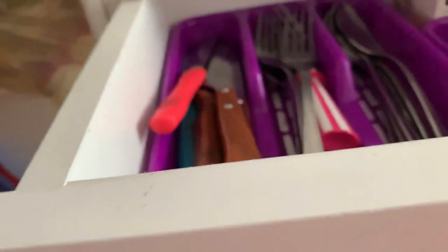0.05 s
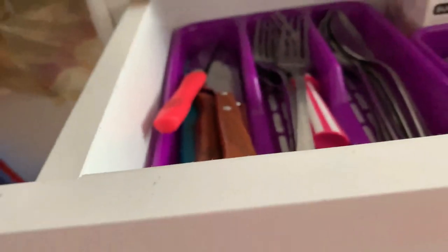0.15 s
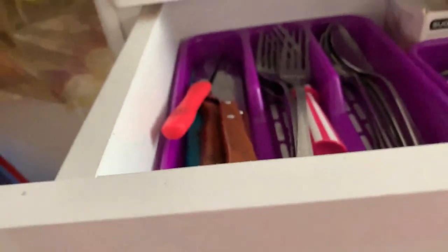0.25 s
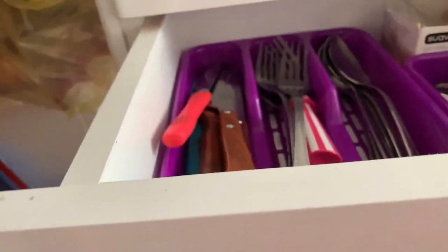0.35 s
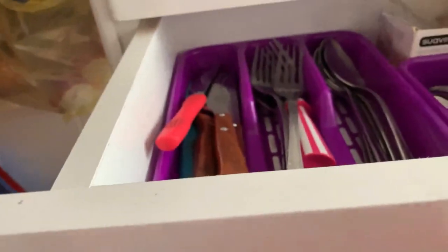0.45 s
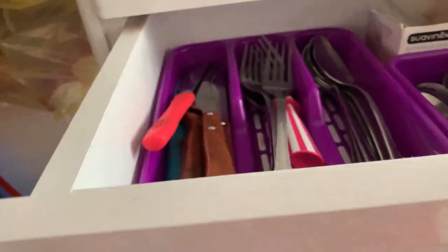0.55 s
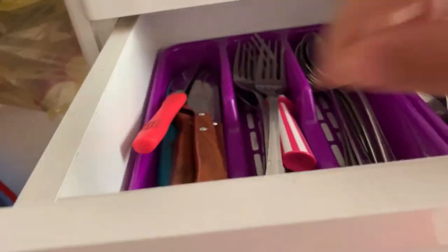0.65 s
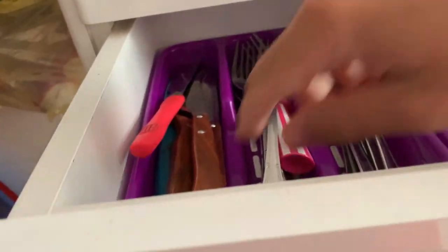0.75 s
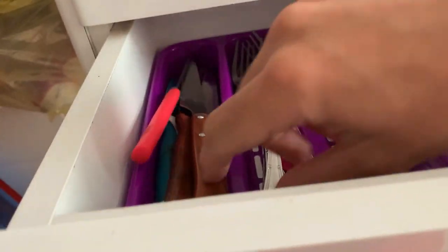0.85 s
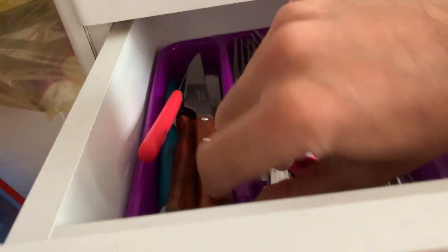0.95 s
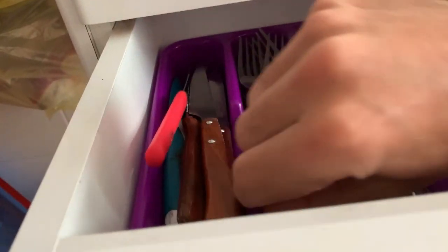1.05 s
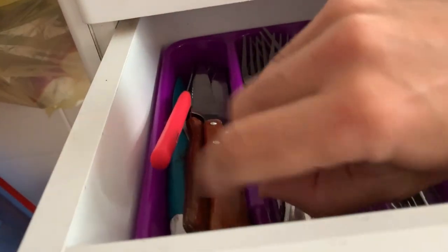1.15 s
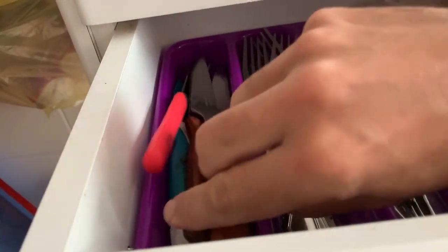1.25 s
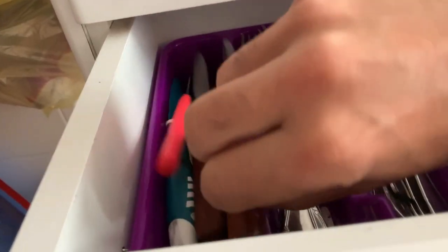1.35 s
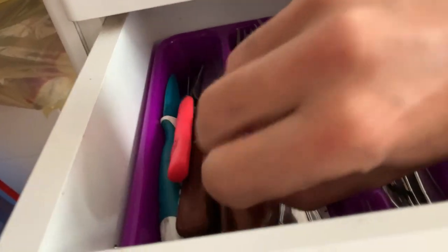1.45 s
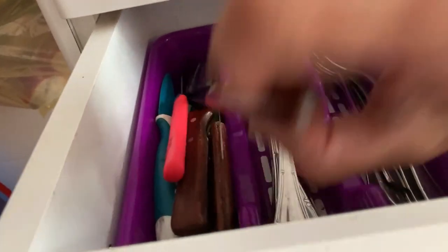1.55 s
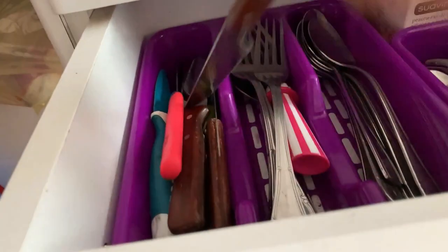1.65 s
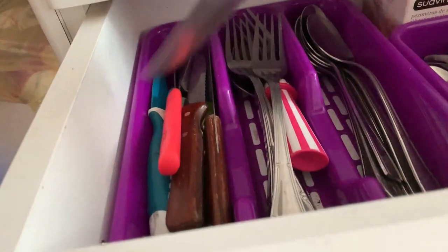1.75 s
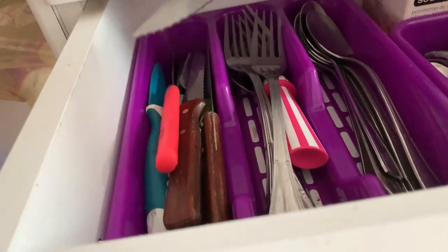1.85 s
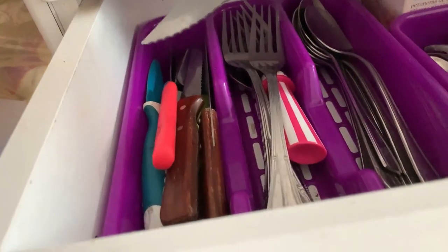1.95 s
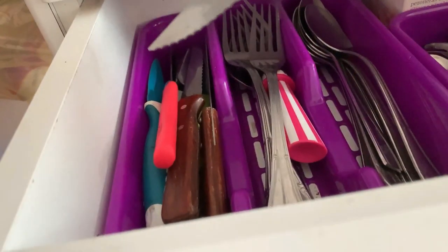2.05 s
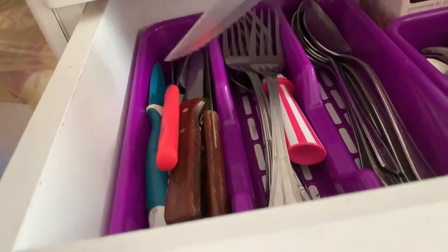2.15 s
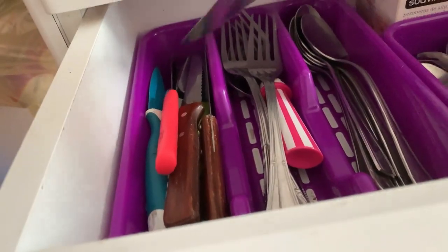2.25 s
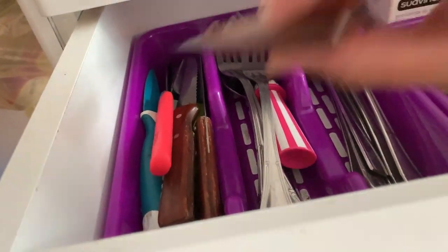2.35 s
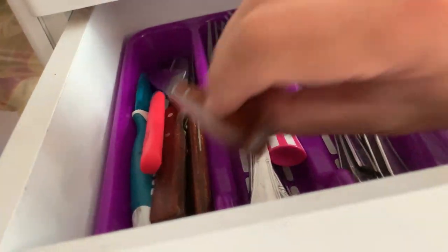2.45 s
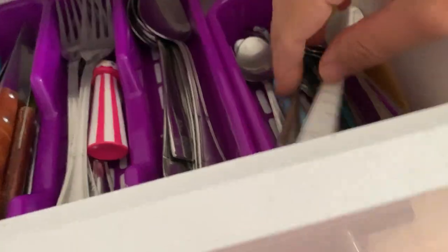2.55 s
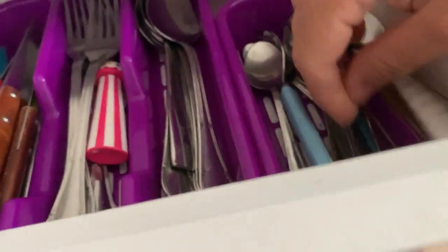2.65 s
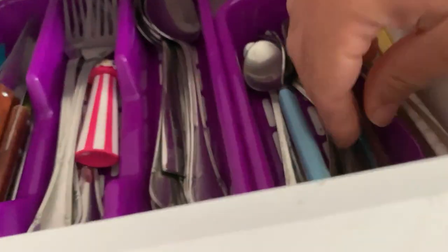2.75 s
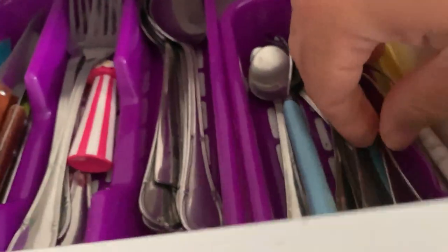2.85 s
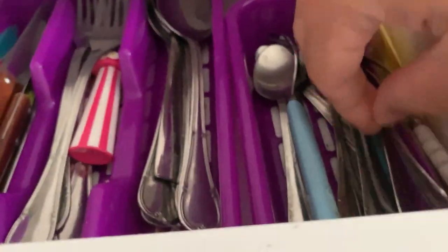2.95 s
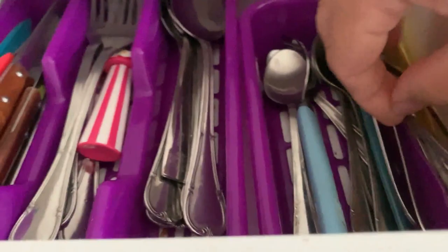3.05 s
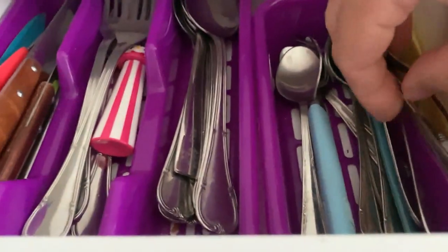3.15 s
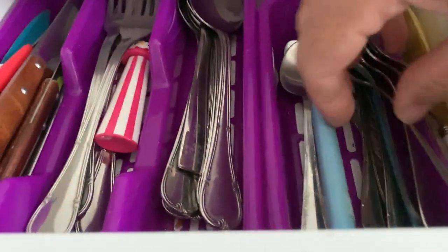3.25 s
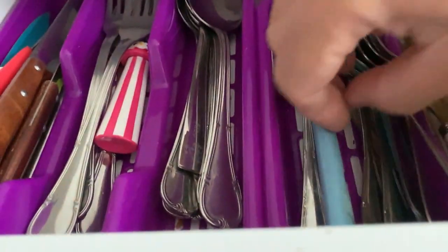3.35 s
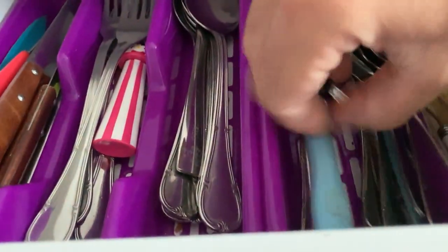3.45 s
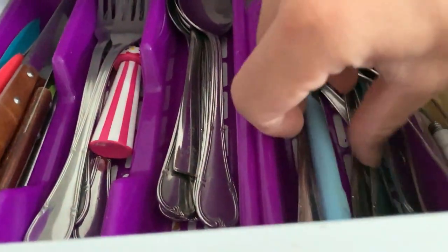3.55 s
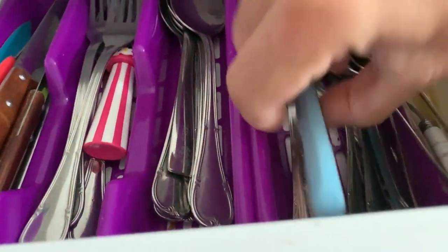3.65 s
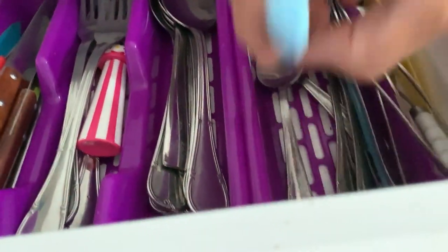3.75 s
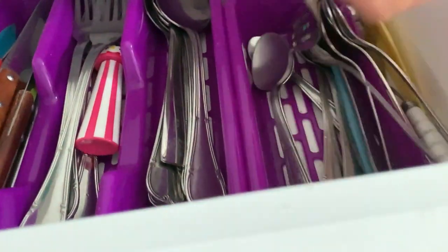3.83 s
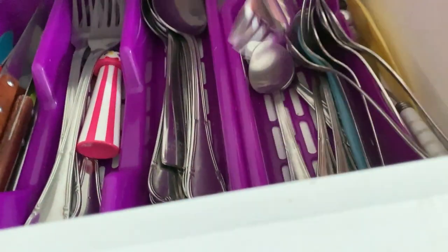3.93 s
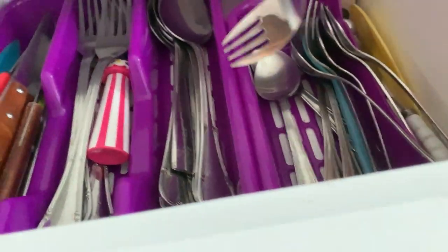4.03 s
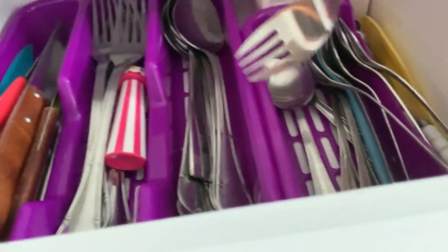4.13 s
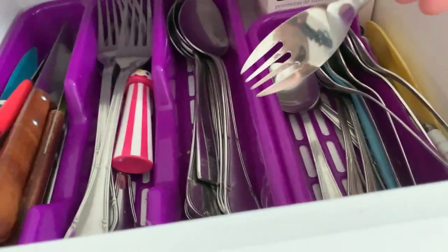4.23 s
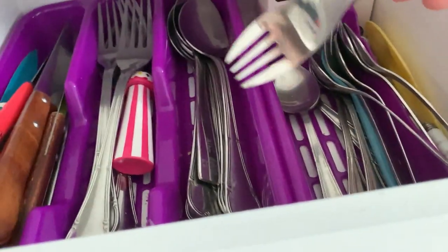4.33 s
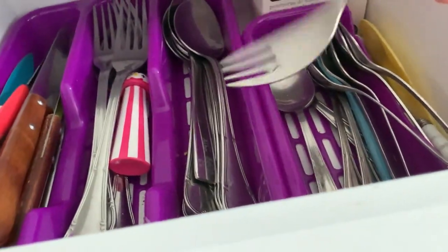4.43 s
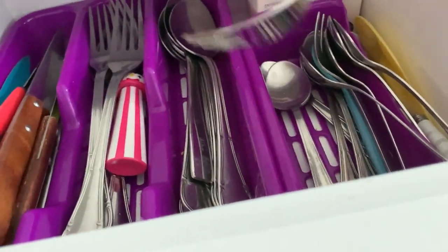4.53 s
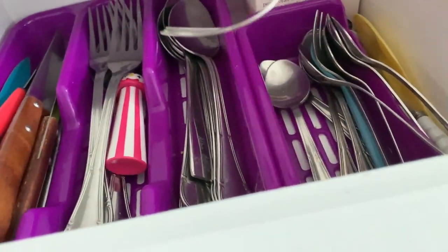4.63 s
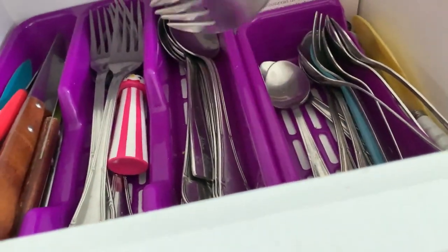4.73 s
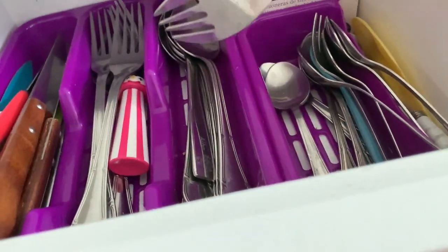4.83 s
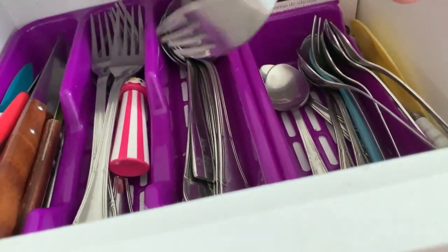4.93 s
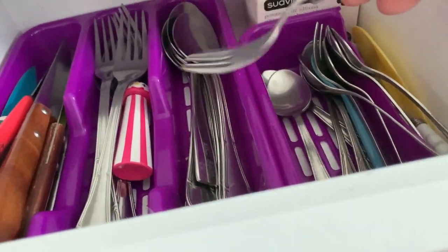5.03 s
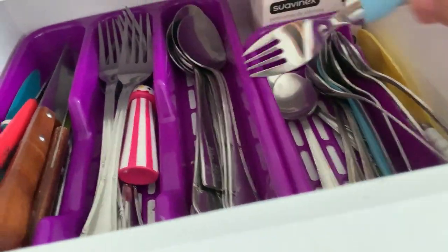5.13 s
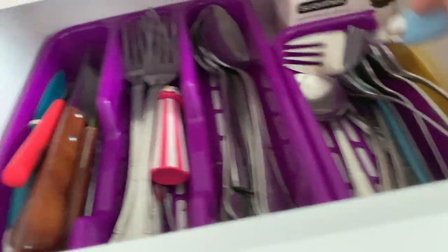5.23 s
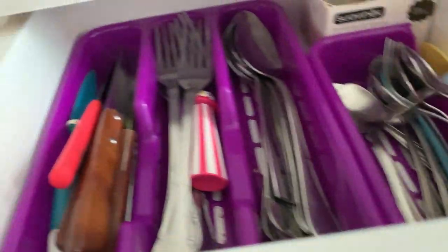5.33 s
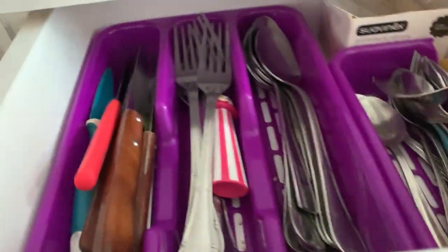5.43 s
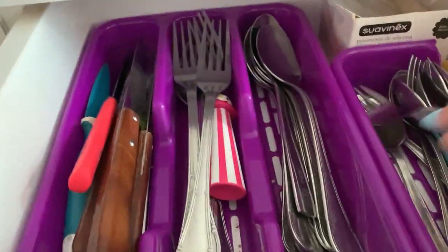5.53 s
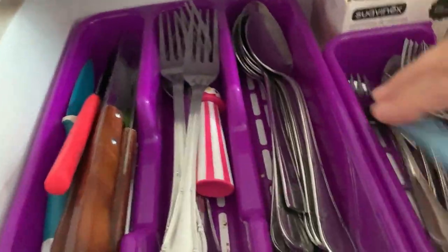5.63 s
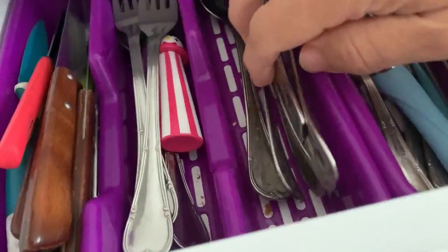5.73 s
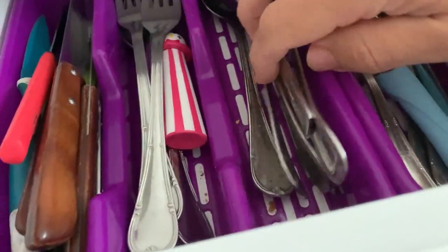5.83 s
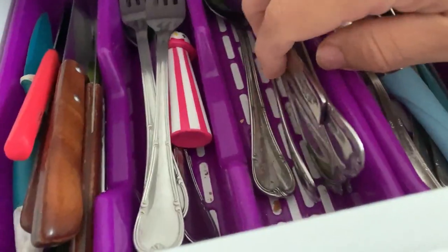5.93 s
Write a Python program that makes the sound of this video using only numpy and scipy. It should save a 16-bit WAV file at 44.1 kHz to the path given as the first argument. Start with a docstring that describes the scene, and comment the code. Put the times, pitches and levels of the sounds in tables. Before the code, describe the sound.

A drawer rolls to a stop with a soft bump. A hand then rummages through steel cutlery in three bursts: pieces clink, chatter and scrape against each other and knock on their hollow plastic tray. A knife rings faintly as it is lifted out, and later a fork rings briefly. The sound is close, in a small, hard kitchen with a low rumble and faint electrical hum.

```python
"""A small, hard kitchen, close up: a drawer rolls to a stop and a hand rummages through steel cutlery.
Pieces clink and chatter against each other, scrape along, and knock and rub their hollow plastic tray.
A knife and a fork ring freely as they are lifted out.
Cupboards and walls answer, over a low rumble and a faint mains hum."""
import sys
import numpy as np
from scipy import signal
from scipy.fft import rfft, irfft
from scipy.io import wavfile
from scipy.ndimage import uniform_filter1d

SR = 44100
rng = np.random.default_rng(int(sys.argv[2]) if len(sys.argv) > 2 else 0)


def wav_record(signal):
    """Record a signal, one row per channel, as 16-bit PCM in the file named by sys.argv[1]."""
    frames = np.transpose(np.atleast_2d(signal))
    bounded = np.clip(frames, -1, 1)
    # unit amplitude maps onto the largest positive 16-bit level
    quanta = np.round(bounded * 32767).astype(np.int16)
    wavfile.write(sys.argv[1], SR, quanta)


N = 263718
TIME = np.arange(N) / SR
HIT = np.arange(8192) / SR  # seconds within one hit
TOP_HZ = 15900

# Sharp hits: a short, abrupt click at 2.574 s, and cutlery clinking together in all the other rows.
# Each row: start in seconds, bright crack and dull clack levels in relative dB.
SHARP_HITS = [(.039, -19, -20), (0.094, -25, -22.5), (.203, -40, -39), (.923, -7.5, -16.5),
              (.977, -12.5, -17), (.998, -11.5, -25), (1.088, -12.5, -17), (1.118, -15, -22),
              (1.137, -4, -15), (1.184, -18, -22.5), (1.337, -9.5, -14), (1.365, -14, -18.5),
              (1.392, -11.5, -12.5), (1.41, -2, -13.5), (1.545, -15.5, -22), (1.64, -13.5, -29),
              (1.684, -10.5, -31.5), (1.754, -11.5, -29), (1.765, -8.5, -23.5), (2.503, -7, -10),
              (2.531, -10, -15.5), (2.574, -19, -19), (2.663, -15.5, -21), (2.695, -9.5, -10.5),
              (2.711, -7, -17.5), (2.922, -8.5, -14.5), (2.94, -8.5, -30.5), (2.971, -14, -31),
              (3.047, -9, -22.5), (3.118, -12.5, -18.5), (3.144, -8.5, -27.5), (3.309, -13.5, -27.5),
              (3.342, -1.5, -14.5), (3.374, -12, -22.5), (3.422, -15, -37.5), (3.529, -14.5, -27),
              (3.551, -9, -25), (3.604, -5.5, -15.5), (3.782, -12.5, -38), (3.845, -22, -34),
              (3.917, -12, -27), (3.991, -7.5, -26), (4.032, -6.5, -38), (5.441, -4, -23.5),
              (5.487, -2, -21), (5.52, -10, -29), (5.595, -12, -32), (5.62, -6.5, -27), (5.744, -6, -28.5),
              (5.878, -21.5, -39)]
# One piece is shoved across another.
# Each row: start and length in seconds, steel and plastic levels in relative dB.
SCRAPES = [(.985, 0.059, -14.5, -21), (1.08, .028, -11, -30), (1.134, .012, -10.5, -24),
           (1.394, 0.055, -14, -21.5), (1.575, 0.028, -18, -28), (1.715, 0.024, -26, -26.5),
           (2.497, 0.024, -20, -23.5), (2.688, 0.095, -12.5, -19), (2.809, 0.041, -14.5, -27),
           (3.137, 0.032, -14.5, -23), (3.326, 0.037, -14.5, -26.5), (3.577, 0.049, -12.5, -24.5),
           (3.717, 0.018, -20, -22.5), (3.808, 0.015, -23, -31), (4.026, 0.044, -15, -30.5),
           (5.227, 0.021, -25, -21.5), (5.63, 0.026, -27, -26.5), (5.738, 0.064, -13, -30)]
# A handle drops on the tray. Each row: start in seconds, level in relative dB, main resonance in Hz.
KNOCKS = [(.01, -24, 410), (.071, -24.5, 408), (0.502, -42, 407), (.941, -18.5, 355), (.988, -12.5, 395),
          (1.057, -15.5, 345), (1.126, -18.5, 374), (1.343, -17.5, 364), (1.392, -13, 403),
          (1.417, -15.5, 379), (1.462, -18.5, 470), (1.492, -17, 372), (2.513, -20.5, 306),
          (2.666, -23.5, 394), (2.73, -15, 420), (2.75, -16, 448), (3.141, -30, 356), (3.342, -26.5, 390),
          (3.616, -12.5, 392), (3.724, -20, 351), (5.24, -13.5, 399), (5.559, -27, 414),
          (5.638, -16.5, 398), (5.774, -23.5, 432), (5.877, -25.5, 362)]
# The hand pushes into the pile.
# Each row: start and hold in seconds, tray rub and steel jostle levels in relative dB.
PUSHES = [(0.768, 0.34, -41, -51), (0.958, 0.25, -25, -25.5), (1.334, 0.19, -22, -23),
          (1.648, 0.1, -29.5, -30), (2.502, 0.015, -28.5, -23), (2.612, .03, -38.5, -46),
          (2.69, 0.19, -26, -21), (2.92, .06, -29.5, -33.5), (3.121, 0.056, -27.5, -36.5),
          (3.24, 0.076, -37.5, -49), (3.33, 0.081, -28, -24), (3.556, 0.023, -28.5, -29),
          (3.72, 0.21, -38, -36), (3.915, 0.091, -27.5, -15), (5.236, 0.082, -42, -61),
          (5.44, 0.36, -30, -19), (5.88, 0.12, -43, -44)]
# The drawer box is bumped. Each row: start in seconds, level in dB, pitch in Hz.
BUMPS = [(0.137, -27.5, 74), (3.949, -35.5, 56.4)]
# Free-ringing steel. Each row: frequency in Hz, level in relative dB, 60 dB decay time in seconds.
FORK_MODES = [(3440, -22, .55), (4651, -12, .18), (5394, -2, .4), (7553, -14, .2), (8700, -10, .2),
              (9545, -7, .29), (9846, -5, .22), (11200, -5, .15), (13990, -4, .27)]
KNIFE_MODES = [(3289, -19, .25), (4226, -22, .35), (7224, -6, .15), (8500, -15, .28), (10530, -9, .22),
               (13770, -9, .22)]
# The tray. Each row: multiple of its main resonance, level in relative dB, 60 dB decay time in seconds.
TRAY_MODES = [(.52, -20, 0.046), (.8, -5.5, 0.04), (1, 0.5, 0.045), (1.17, -7, 0.045), (1.83, -11, 0.033),
              (2.15, -5, 0.028)]
# Tone curves of the sources. Each row: frequency in Hz, gain in relative dB.
STEEL_EQ = [(1000, -37), (2800, -14), (4500, -9), (6500, -3.5), (8500, 3), (14000, 2.5), (16000, 3)]
PLASTIC_EQ = [(60, -21.5), (170, -14.5), (300, 5), (410, 14.5), (570, -3), (850, 3), (1800, 2),
              (3000, -1.5), (5000, -7), (10000, -50)]
TRAY_RUB_EQ = [(60, -19.5), (200, -9.5), (410, 6), (560, -4.5), (1900, -8.5), (4500, -11), (9000, -11),
               (16000, -14)]
ROLLER_EQ = [(25, -8), (70, -9), (130, -3), (420, -9.5), (620, -13.5), (1500, -25), (5000, -23.5),
             (14000, -36)]
ROOM_TONE_EQ = [(25, -15), (55, -0.5), (110, -18), (180, -18), (400, -31), (1000, -37), (3000, -48.5),
                (15000, -52)]
# Stereo image: side against mid, then each channel's tone. Each row: frequency in Hz, gain in dB.
WIDTH_EQ = [(200, -16), (400, -13), (750, -1.5), (2300, 0.5), (4400, 1), (8100, -6.5), (15000, -18)]
LEFT_EQ = [(150, 1.1), (1100, -2.4), (4000, -1.3)]
RIGHT_EQ = [(150, 0.51), (1100, 1.9), (4000, -0.33)]
# Mains hum. Each row: frequency in Hz, RMS level in dB.
MAINS_HUM = [(48.4, -69.5), (96.9, -59.5)]


def clinks_and_click(crack_trim_db=-3, clack_trim_db=-5, ring_db=-22, crack_t60=.022, clack_t60=.064):
    """Steel cracks and rings briefly, damped by the pile, as handles clack; one hit is just a click."""
    out = np.zeros((2, N))
    bite = 1 - np.exp(-HIT / .00057)  # attack of about half a millisecond
    for start, crack_db, clack_db in SHARP_HITS:
        force = chatter()
        ringing = ring(FORK_MODES + KNIFE_MODES, HIT, scale=rng.uniform(.8, 1.15), contact_t60=.12)
        crack = contact_spot(colour(noise(len(HIT)) * bite * fade(HIT, crack_t60), STEEL_EQ))
        bright = at_peak(crack, 0) + at_peak(ringing, ring_db)
        clack = contact_spot(colour(noise(len(HIT)) * bite * fade(HIT, clack_t60), PLASTIC_EQ))
        add(out, start, at_peak(signal.fftconvolve(bright, force, axes=1), crack_db + crack_trim_db))
        add(out, start, at_peak(signal.fftconvolve(clack, force, axes=1), clack_db + clack_trim_db))
    return out


def chatter(decay_s=.003, scatter_db=4, rebounds=6):
    """The force of a first contact and a quick run of uneven rebounds."""
    when = rng.uniform(0, 2 * decay_s, rebounds)
    strength = np.exp(-when / decay_s) * undb(scatter_db * rng.standard_normal(rebounds))
    force = np.zeros(len(HIT) // 2)
    force[(when * SR).astype(int)] = strength * rng.choice([-1, 1], rebounds)
    force[0] = .63
    return force[None]


def ring(modes, t, scale=1, contact_t60=np.inf, scatter_db=3):
    """Decaying modes: where the blow lands sets their strengths, and touching other things damps them."""
    hz, db, t60 = np.transpose(modes)
    waves = np.sin(2 * np.pi * scale * hz[:, None] * t) * fade(t, t60[:, None])
    strength = undb(db + scatter_db * rng.standard_normal((2, len(hz))))
    polarity = rng.choice([-1, 1], (2, len(hz)))
    return (strength * polarity) @ waves * fade(t, contact_t60)


def contact_spot(x, lumps_db=3, bands=44):
    """Every point of contact favours its own resonances of the pile."""
    hz = np.geomspace(600, TOP_HZ, bands)
    return colour(x, np.column_stack([hz, lumps_db * rng.standard_normal(bands)]))


def scrapes(steel_trim_db=-1, plastic_trim_db=-2, roundness=.34):
    """A shove swells and eases while tines and edges judder over each other."""
    out = np.zeros((2, N))
    for start, length, steel_db, plastic_db in SCRAPES:
        pressure = np.abs(np.sin(np.pi * np.minimum(HIT / length, 1))) ** roundness
        rub = friction(len(HIT)) * pressure
        for eq, db in (STEEL_EQ, steel_db + steel_trim_db), (PLASTIC_EQ, plastic_db + plastic_trim_db):
            rasp = contact_spot(colour(rub, eq))
            add(out, start, undb(db) * rasp * np.linalg.norm(pressure) / np.linalg.norm(rasp[0]))
    return out


def friction(size, slips_per_s=1000, grain_db=3.5, slip_t60=.063):
    """Stick and slip: dense, uneven ticks blur into a grainy hiss."""
    slips = rng.random(size) < slips_per_s / SR
    strength = undb(grain_db * np.minimum(rng.exponential(size=size), 4))
    power = signal.lfilter([1], [1, -fade(2 / SR, slip_t60)], (slips * strength) ** 2)
    return noise(size) * np.sqrt(power / power.mean())


def tray_knocks(trim_db=-2, attack_s=.0013):
    """The hollow tray answers a dropped handle with a few short, low modes."""
    out = np.zeros((2, N))
    attack = 1 - np.exp(-HIT / attack_s)
    for start, db, hz in KNOCKS:
        add(out, start, at_peak(ring(TRAY_MODES, HIT, scale=hz) * attack, db + trim_db))
    return out


def tray_rub(trim_db=-3):
    """Each push rubs the pile along the tray."""
    force = sum(undb(db + trim_db) * hand_push(start, hold) for start, hold, db, _ in PUSHES)
    return colour(friction(N, slips_per_s=900, grain_db=1.5) * force, TRAY_RUB_EQ)


def jostles(trim_db=-3, ticks_per_s=210, tick_t60=.027, pieces=8):
    """Under the hand, loose pieces tick together at random, each piece with its own colour."""
    force = sum(undb(db + trim_db) * hand_push(start, hold) for start, hold, _, db in PUSHES)
    ticks = (rng.random(N) < ticks_per_s / SR) * force
    struck = rng.integers(0, pieces, N)
    out = np.zeros((2, N))
    for piece in range(pieces):
        crack = contact_spot(colour(noise(len(HIT)) * fade(HIT, tick_t60), STEEL_EQ), lumps_db=6)
        crack /= np.linalg.norm(crack[0])
        out += signal.oaconvolve((ticks * (struck == piece))[None], crack, axes=1)[:, :N]
    return out * np.sqrt(SR / ticks_per_s)


def hand_push(start, hold, attack_share=.075, ease_db_per_s=9.5, settle_t60=.21):
    """Pressure builds, eases while it is held, then dies away as the pile settles."""
    t = np.maximum(TIME - start, 0)
    attack = np.minimum(t / (attack_share * hold), 1)
    release = fade(np.clip(t - hold, 0, 1), settle_t60)
    return attack * undb(-ease_db_per_s * t) * release


def lifted_piece(modes, last_touch_s, db):
    """A piece pulled clear of the pile rings freely after its last touch."""
    out = np.zeros((2, N))
    add(out, last_touch_s, at_peak(ring(modes, TIME[:SR]), db))
    return out


def drawer(roll_db=-30, stop_s=.14, roll_t60=.26, bump_t60=.45, swell_s=.0074):
    """Rollers rumble steadily up to the stop, then die away; the box booms when it is bumped."""
    out = colour(noise(), ROLLER_EQ) * undb(roll_db) * fade(np.maximum(TIME - stop_s, 0), roll_t60)
    envelope = fade(HIT, bump_t60) * (1 - np.exp(-HIT / swell_s))
    for start, db, hz in BUMPS:
        boom = np.sin(2 * np.pi * hz * HIT) * envelope
        add(out, start, undb(db) * boom[None])
    return out


def reverb(x, wall_db=-17, near_db=-11, near_t60=.25, low_t60=.47, high_t60=.16, split_hz=4000):
    """Early reflections off drawer and cupboards, then the walls, where the treble dies first."""
    t = TIME[:SR // 2]
    air = noise(len(t))
    low = signal.sosfilt(signal.butter(2, split_hz, fs=SR, output="sos"), air)
    high = signal.sosfilt(signal.butter(2, split_hz, "high", fs=SR, output="sos"), air)
    bloom = 1 - np.exp(-t / .0063)
    walls = (low * fade(t, low_t60) + undb(1) * high * fade(t, high_t60)) * bloom
    near = noise(len(t)) * fade(t, near_t60) * (t > .002)  # 2 ms pre-delay
    response = undb(wall_db) * walls / np.linalg.norm(walls[0])
    response += undb(near_db) * near / np.linalg.norm(near[0])
    return signal.fftconvolve(x[:1], response, axes=1)[:, :N]


def room_tone(rumble_db=-57):
    """A bed of low rumble, with an appliance humming in the centre."""
    out = undb(rumble_db) * colour(noise(), ROOM_TONE_EQ)
    out[0] += sum(np.sqrt(2) * undb(db) * np.sin(2 * np.pi * hz * TIME) for hz, db in MAINS_HUM)
    return out


def undb(db):
    """Decibels to gain."""
    return 10 ** (np.asarray(db) / 20)


def noise(size=N):
    """Two unrelated white noises: mid and side."""
    return rng.standard_normal((2, size))


def fade(t, t60):
    """Exponential decay, 60 dB down after t60 seconds."""
    return np.exp(-np.log(1000) * t / t60)


def colour(x, points, keep_power=True, size=2048):
    """Minimum-phase EQ through (Hz, dB) points; with keep_power, white noise keeps its level."""
    hz, db = np.transpose(points)
    bin_hz = np.arange(size // 2 + 1) * SR / size
    gain = undb(np.interp(np.log(bin_hz + 1), np.log(hz), db))
    if keep_power:
        gain /= np.sqrt(np.mean(gain ** 2))
    # Folding the cepstrum keeps all ringing after the attack.
    cepstrum = irfft(np.log(gain))
    cepstrum[1:size // 2] *= 2
    cepstrum[size // 2 + 1:] = 0
    response = irfft(np.exp(rfft(cepstrum)))
    return signal.fftconvolve(x, response[None], axes=1)[:, :x.shape[1]]


def at_peak(x, db, window=160):
    """Scale a hit so that its loudest few milliseconds have this level."""
    power = uniform_filter1d(np.mean(x ** 2, axis=0), window)
    return x * undb(db) / np.sqrt(power.max())


def add(out, start, x):
    """Mix x into out from start, in seconds."""
    i = int(start * SR)
    out[:, i:i + x.shape[1]] += x[:, :N - i]


def scene():
    """Mix cutlery, drawer and room as mid and side, then spread them left and right."""
    close = clinks_and_click() + scrapes() + tray_knocks() + tray_rub() + jostles() + drawer()
    close += lifted_piece(KNIFE_MODES, last_touch_s=1.765, db=-44)
    close += lifted_piece(FORK_MODES, last_touch_s=4.035, db=-32)
    mix = close + reverb(close) + room_tone()
    mid, side = mix[:1], colour(mix[1:], WIDTH_EQ, keep_power=False)
    left = colour(mid + side, LEFT_EQ, keep_power=False)
    left = signal.lfilter([1, 2], [2, 1], left)  # all-pass: about a third of a sample late
    right = colour(mid - side, RIGHT_EQ, keep_power=False)
    return np.vstack([left, right])


def record(dry):
    """Hard-clip any peaks over full scale and cut the top end steeply."""
    high_cut = signal.ellip(12, .2, 90, TOP_HZ, fs=SR, output="sos")
    return signal.sosfilt(high_cut, np.clip(dry, -1, 1))


dry = scene()
out = record(dry)
wav_record(out)
```